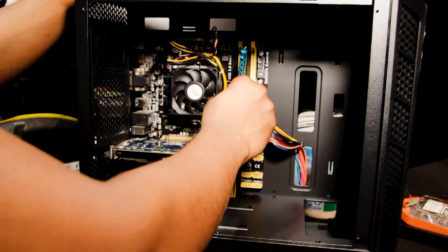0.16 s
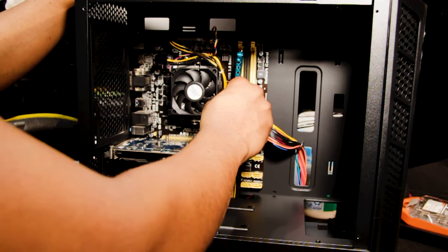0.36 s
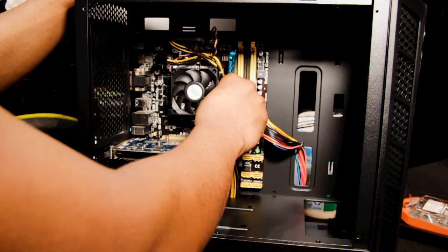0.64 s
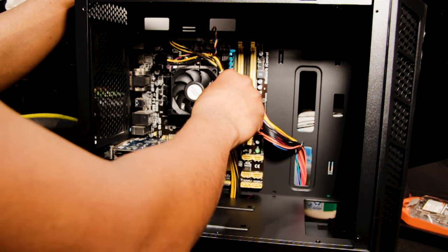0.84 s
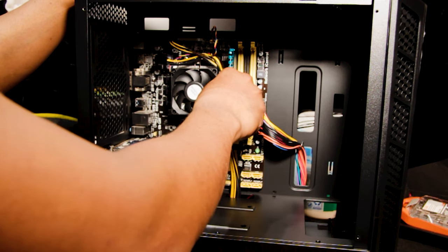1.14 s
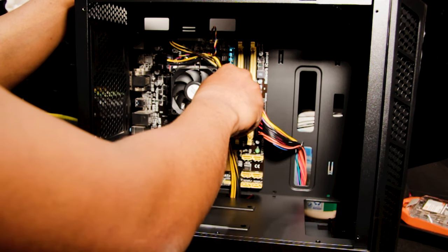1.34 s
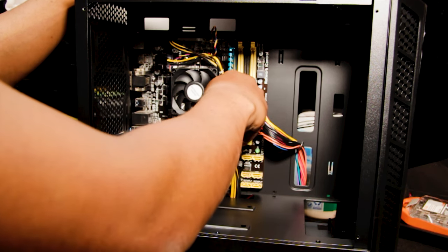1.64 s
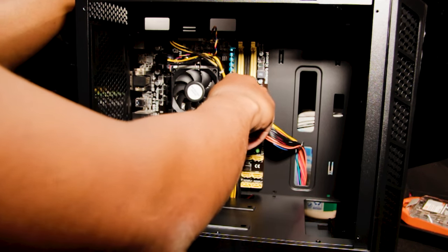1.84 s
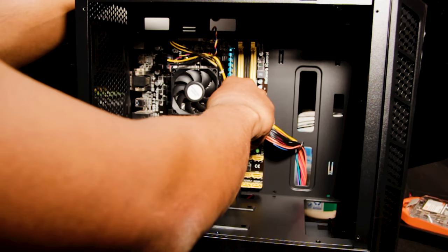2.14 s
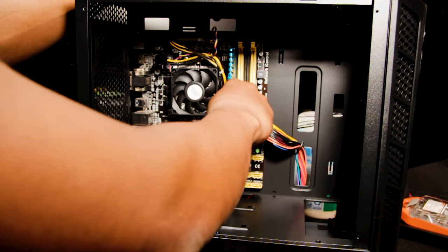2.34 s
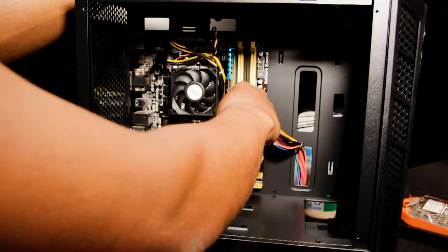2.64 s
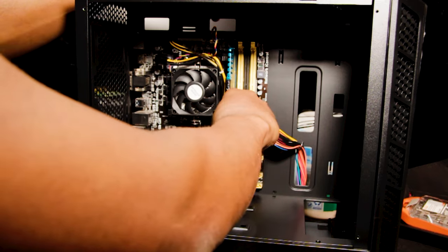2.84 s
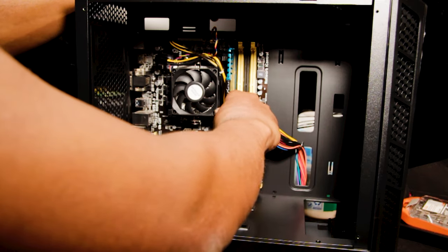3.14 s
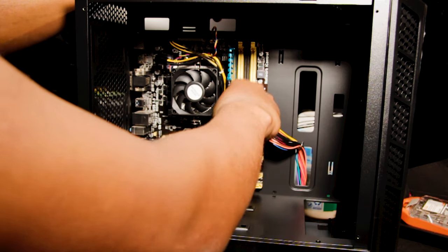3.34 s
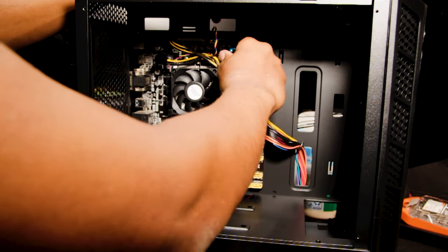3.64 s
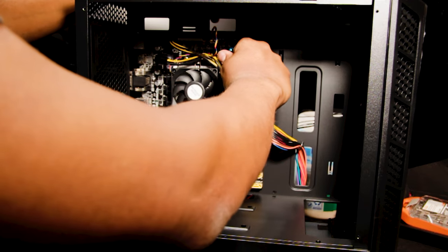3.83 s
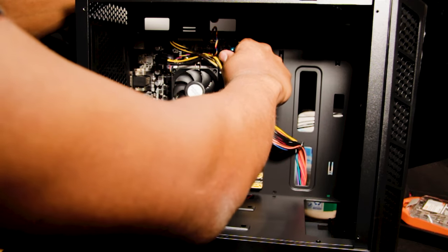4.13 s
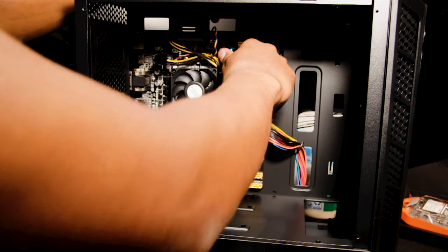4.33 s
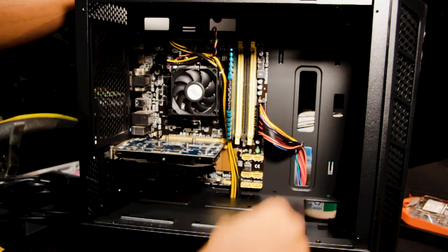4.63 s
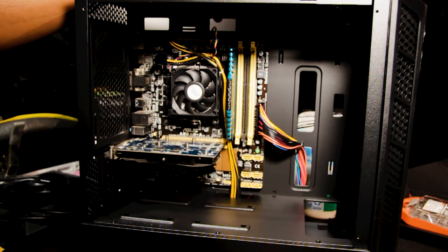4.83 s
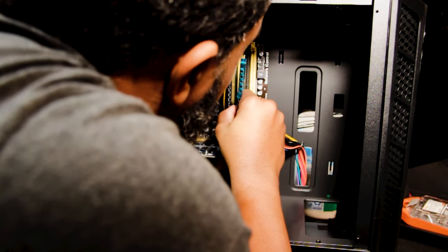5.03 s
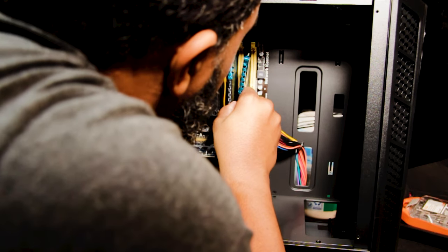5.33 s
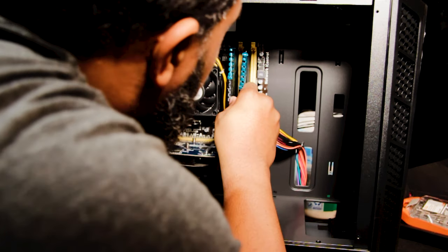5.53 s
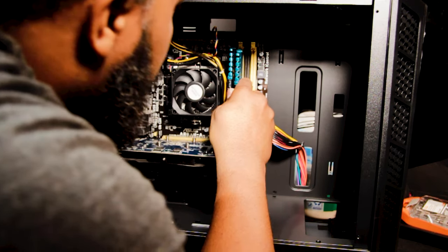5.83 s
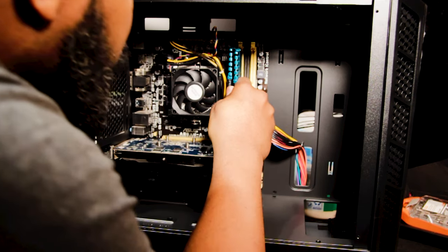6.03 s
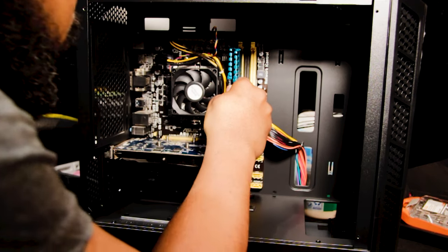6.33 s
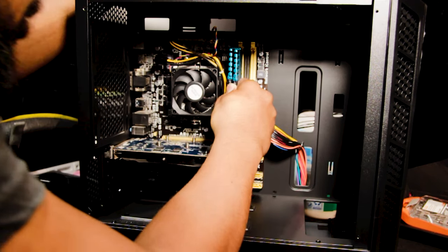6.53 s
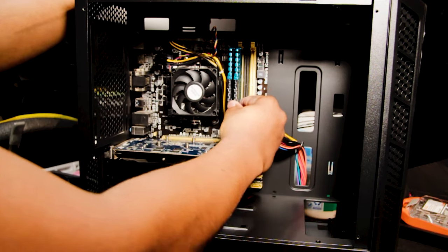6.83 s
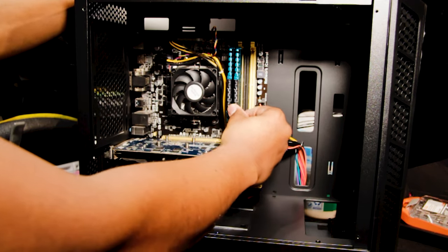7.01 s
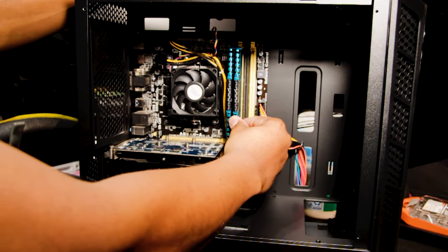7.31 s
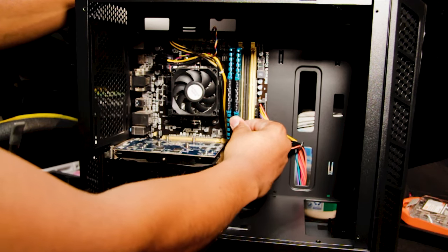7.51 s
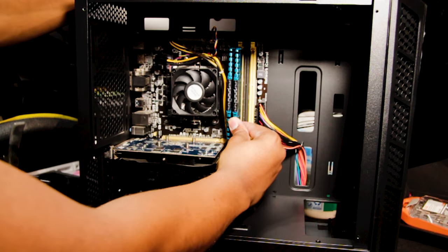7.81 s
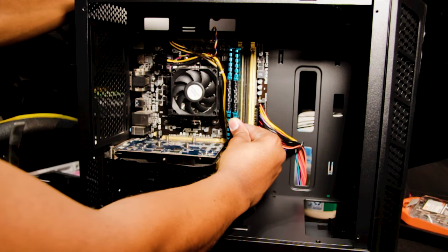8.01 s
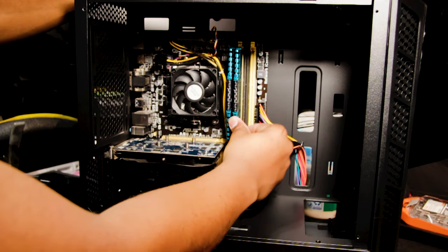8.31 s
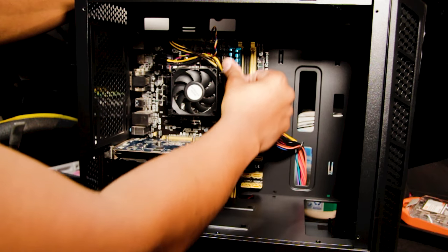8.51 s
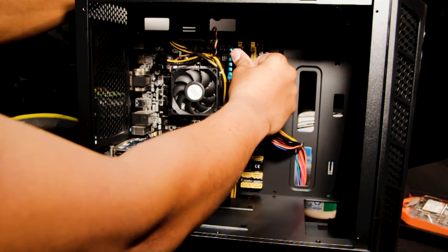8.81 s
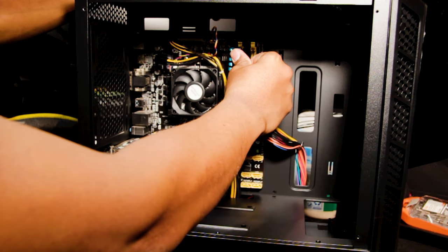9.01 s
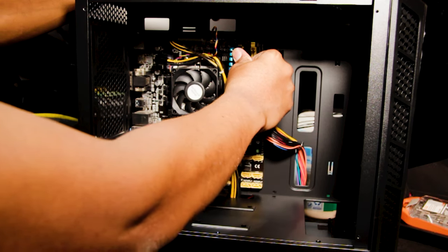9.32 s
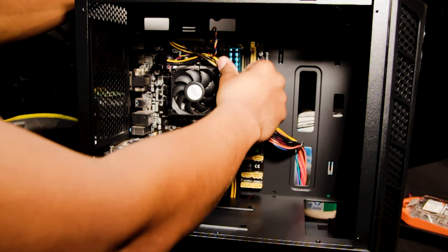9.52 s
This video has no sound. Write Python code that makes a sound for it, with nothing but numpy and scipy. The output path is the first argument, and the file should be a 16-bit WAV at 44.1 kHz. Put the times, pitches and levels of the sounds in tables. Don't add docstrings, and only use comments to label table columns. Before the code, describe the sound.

Close up at an open metal computer case, fingers tap and scrape board and cables, then a plastic latch cracks shut, followed about a second later by another. Lighter ticks and nudges fill the middle before two more snaps near the end, the last softest. Each contact briefly rings the panels; a quiet room hums beneath microphone hiss.

```python
import sys
import numpy as np
from scipy import signal
from scipy.fft import rfft, irfft
from scipy.io import wavfile
from scipy.ndimage import uniform_filter1d

SR = 44100
rng = np.random.default_rng(int(sys.argv[2]) if len(sys.argv) > 2 else 0)


def volts_from_db(level):
    exponent = np.asarray(level, float) / 20
    return 10 ** exponent


def store_wav(level_fs):
    pcm = np.round(np.clip(np.atleast_2d(level_fs), -1, 1) * 32767)
    wavfile.write(sys.argv[1], SR, pcm.T.astype(np.int16))


N = 426006


def level(x, db):
    return x * volts_from_db(db) / np.sqrt(np.mean(x ** 2))


def band(x, lo_hz, hi_hz):
    return signal.sosfilt(signal.butter(2, [lo_hz, hi_hz], "bandpass", fs=SR, output="sos"), x)


def coloured(points):
    cut_hz = 15770
    hz, db = np.transpose(points)
    f = np.maximum(np.fft.rfftfreq(N, 1 / SR), 1)
    gain = volts_from_db(np.interp(np.log(f), np.log(hz), db)) * (f < cut_hz)
    return level(irfft(rfft(rng.standard_normal(N)) * gain, N), 0)


def walk(rate_hz):
    hold = int(SR / rate_hz)
    steps = np.repeat(rng.standard_normal(N // hold + 1), hold)
    slewed = uniform_filter1d(uniform_filter1d(steps, hold), hold)
    return level(slewed[:N], 0)


def fade(t60_s, size):
    return 1000. ** (-np.arange(size) / SR / max(t60_s, .005))


def ring(modes, size=SR // 2):
    t = np.arange(size) / SR
    out = 0
    for k, (hz, db, t60_s) in enumerate(modes):
        out = out + (-1) ** k * volts_from_db(db) * np.sin(2 * np.pi * hz * t) * fade(t60_s, size)
    return out


def add(track, s, sound):
    i = int(s * SR)
    track[i:i + len(sound)] += sound[:N - i]


def contact(colour, ms, rise, blow_db, grit_db, size=SR // 4):
    # (frequency [Hz], early level [dB], early t60 [s], late level [dB], late t60 [s])
    case_bands = [(287, 3.5, 0.16, -10, 0.38), (410, 0.5, 0.13, -5, 0.39), (586, 2.5, 0.12, -7, 0.39),
                  (939, 8, 0.061, -6, 0.25), (1450, -1, 0.063, -5.5, 0.2), (2070, -4.5, 0.047, -1, 0.14),
                  (3110, 4.5, 0.061, -7.5, 0.15), (5050, 10.5, 0.027, -4, 0.15),
                  (6900, 13.5, 0.018, -20.5, 0.063), (9970, 9.5, 0.024, -8.5, 0.13),
                  (8340, 10, 0.027, -12, 0.16), (12130, 3, 0.03, -11.5, 0.12),
                  (13960, -15, 0.016, -20, 0.11)]
    t = np.arange(size) / SR * 1000 / np.clip(ms, .3, 30)
    chance = rng.standard_normal((3, size))
    unevenness_db = grit_db * uniform_filter1d(chance[1], 9) * 3.6
    grains = chance[0] * volts_from_db(unevenness_db) * np.exp(-t)
    grains[int(rise * ms * SR / 1000)] += volts_from_db(blow_db)
    swell = 1 - np.exp(-t / rise)
    colour_hz, colour_db = np.transpose(colour)
    out = 0
    for hz, early_db, early_t60_s, late_db, late_t60_s in case_bands:
        early = volts_from_db(early_db - 6.5) * fade(early_t60_s, size)
        late = volts_from_db(late_db - 1.5) * fade(late_t60_s, size)
        tail = chance[2] * (early + late)
        gain = volts_from_db(np.interp(np.log(hz), np.log(colour_hz), colour_db))
        out = out + gain * band((grains + tail) * swell, hz / 1.163, hz * 1.145)
    return out


def latches():
    # (time [s], peak [dB], chatter [ms])
    snaps = [
        (3.1233, -13, 1.9),
        (4.0805, -14.5, 2.36),
        (8.079, -13.5, 2.2),
        (9.1579, -17, 1.93),
    ]
    # (lead [ms], level [dB], frequency [Hz])
    yields = [
        (2.36, -35, 1080),
        (1.1, -23.5, 440),
        (2.7, -46, 1080),
        (2.48, -34.5, 660),
    ]
    # (frequency [Hz], density [dB per Hz])
    snap_colours = [
        [(150, -44), (250, -12), (968, -1.5), (1620, 0.5), (1950, 4), (2090, -3.5), (3620, -4.5), (4300, -12.5),
         (5460, -7), (6260, -24), (8970, -7), (15000, -12.5)],
        [(150, -35), (250, 2), (433, -1.5), (801, -8), (1360, 6), (1790, -11), (2130, -0.5), (4080, -3),
         (5280, -6.5), (7300, -14), (7960, -7), (15000, -14)],
        [(150, -33), (250, -6), (463, -7.5), (641, -0.5), (844, -8), (1250, -4.5), (1990, -0.5), (3620, -11),
         (5100, -10.5), (5950, -19), (10100, -6.5), (15000, -14)],
        [(150, -39), (250, -10), (788, -7.5), (919, -9), (1070, -18), (1390, -1.5), (1790, -6), (3620, -1),
         (5100, -2.5), (5550, -2), (10800, -7.5), (15000, -15)],
    ]
    # (frequency [Hz], level [dB], t60 [s])
    clacks = [
        [(800, -27, 0.043), (1982, -20.5, 0.038), (2693, -23, 0.025)],
        [(1286, -34.5, 0.07), (2890, -40, .05), (4790, -36, 0.035)],
        [(800, -30, 0.075), (1870, -22, 0.035), (2740, -33.5, 0.099)],
        [(1380, -39.5, 0.14), (3640, -19.5, 0.017), (4600, -43, 0.051)],
    ]
    # (frequency [Hz], level [dB], t60 [s])
    latch_modes = [
        [(305, -14.5, 0.38), (640, -8, 0.091), (824, -19, 0.22), (890, -19, 0.58), (931, 11, 0.086),
         (1002, -10.5, 0.17)],
        [(261, -20, 0.14), (316, -10, 0.26), (344, -10.5, 0.45), (570, 2, 0.28), (608, -20, 0.67),
         (985, -12, 0.47)],
        [(310, -0.5, 0.41), (560, -18, 0.3), (640, -6, 0.2), (904, 0, 0.23), (1044, -6, 0.2), (1113, -13, 0.32)],
        [(288, -0.5, 0.23), (354, -14, 0.44), (546, -18, 0.97), (646, -15, 0.092), (907, 3, 0.16),
         (1000, -12, 0.44)],
    ]
    latch_ring_db = [-38, -46, -47, -47.5]
    # (frequency [Hz], level [dB], t60 [s])
    long_modes = [(638, -53, 0.61), (555, -51, 0.55)]
    long_ring_db = [-2, 0.5, 2.5, -11]
    out = np.zeros(N)
    for k, (s, peak_db, ms) in enumerate(snaps):
        onset = 1 - fade(.003, SR // 2)
        lead_ms, db, hz = yields[k]
        add(out, s - lead_ms / 1000, ring([(hz, db, .02)]) * onset)
        crack = contact(snap_colours[k], ms, 0.16, blow_db=21, grit_db=2.0, size=SR // 3)
        add(out, s, volts_from_db(peak_db - 1.5) * crack)
        add(out, s, volts_from_db(long_ring_db[k]) * ring(long_modes) * (1 - fade(.2, SR // 2)))
        add(out, s, (ring(clacks[k]) + volts_from_db(latch_ring_db[k]) * ring(latch_modes[k])) * onset)
    return out


def contacts():
    # (time [s], peak [dB], weight = bass under peak [dB], hardness = treble under peak [dB])
    knocks = [(0.383, -46.5, -5.5, -21), (0.674, -40.5, -9.5, -12), (0.834, -29.5, -20, -18),
              (0.977, -36, -9.5, -22.5), (1.192, -36.5, -24, -14.5), (1.711, -48.5, -7, -14.5),
              (2.467, -50, -9.5, -19), (2.708, -37.5, -25, -14), (3.986, -42.5, -7, -15.5),
              (4.364, -62.5, 1, -7), (5.515, -57, -1, -18), (5.638, -54.5, -8, -18),
              (6.0008, -38, -10, -20), (6.834, -54.5, -0.5, -8), (7.37, -50, 1.3, -8),
              (8.212, -67, -2, -13), (3.881, -40.5, -20, -12), (9.102, -53.5, -2, 1.5)]
    # (time [s], peak [dB], weight [dB], hardness [dB])
    ticks = [(0.6121, -47, -30, -22), (0.6382, -49.5, -14, -12.5), (1.527, -53.5, -10.5, -19),
             (2.2789, -46, -19, -13), (3.2046, -46, -27, -19), (3.5799, -49, -12, -9.5),
             (5.7713, -39, -22, -11), (6.1495, -51.5, -20.5, -13.5), (6.3256, -39, -16, -13.5),
             (6.338, -44, -19, -23), (0.824, -51, -1, -19), (8.3732, -57, -24, -17),
             (9.431, -47.5, -21, -15), (9.5134, -65.5, -3.5, 1.1), (9.5555, -60, -11, -16)]
    # (time [s], peak [dB], weight [dB], hardness [dB])
    scrapes = [(1.2363, -38.5, -11.5, -14.5), (2.084, -54, -17, -7), (2.131, -51.5, -13, -11),
               (2.6242, -55, -9, -14), (2.6382, -56.5, -4, -7), (2.6609, -48, -10, -17.5),
               (2.9772, -48, -12, -24), (3.4273, -53.5, -25, -6), (3.59, -53.5, -7.5, -18),
               (3.881, -39, -16.5, -22), (5.0772, -42, -7.5, -12), (5.5042, -49, -3.5, -10),
               (6.0932, -53, -7, -11), (6.7, -62, 4, -7), (6.894, -55, -3.5, -6), (7.1944, -56, -8, -10),
               (7.2196, -52.5, -4, -12), (7.2404, -54, -1.5, -8), (7.2597, -56, -4.5, 4.5),
               (8.4418, -53, -10, -6), (9.0985, -41, -8, -3)]
    edges_hz = np.array([180, 600, 1800, 5000, 15000])
    # (frequency [Hz], level [dB], t60 [s])
    panel_modes = [(259.6, -3, 0.28), (298.6, -5.5, 0.37), (410, -5.5, 0.2), (632, -5, 0.23)]
    # (frequency [Hz], width [Hz], level [dB])
    cavity = [(2740, 460, -12), (4736, 500, -21.5), (9900, 1600, -13)]

    def dull(rms_db, weight_db, hard_db):
        return [weight_db, rms_db, hard_db, hard_db * 1.78]

    def thin(lean_db):
        return lambda rms_db, weight_db, hard_db: [weight_db - lean_db, weight_db + lean_db, rms_db, hard_db]

    # (table, band levels, peak to rms [dB], chatter [ms], rise [chatters], first blow [dB], grit [dB])
    kinds = ((knocks, dull, -9, 1.7, .18, 24, 2.5),
             (ticks, thin(1.5), -9, 1.7, .18, 22, 2.5),
             (scrapes, thin(-1.5), -7, 7.7, .9, 4, 3.5))
    out = np.zeros(N)
    centres_hz = [*np.sqrt(edges_hz[1:] * edges_hz[:-1]), edges_hz[-1]]
    for table, shape, rms_db, ms, rise, blow_db, grit_db in kinds:
        for s, peak_db, weight_db, hard_db in table:
            band_db = peak_db + np.array(shape(rms_db, weight_db, hard_db))
            per_hz_db = band_db - 10 * np.log10(np.diff(edges_hz) / (SR / 2))
            colour = np.transpose([centres_hz, [*per_hz_db, per_hz_db[-1] - 19.5]])
            add(out, s, contact(colour, ms, rise, blow_db, grit_db, size=SR // 5))
            struck = []
            for (hz, db, t60_s), luck in zip(panel_modes, rng.standard_normal(len(panel_modes))):
                struck.append((hz, db + band_db[0] - 10.5 + 3 * np.clip(luck, -2, 1.5), t60_s))
            add(out, s, ring(struck, SR // 4) * (1 - fade(0.0058, SR // 4)))
    return out + sum(volts_from_db(db) * band(out, hz - w / 2, hz + w / 2) for hz, w, db in cavity)


def parts(size=SR // 4):
    # (time [s], frequency [Hz], level [dB])
    board = [(.826, 786, -49), (.833, 800, -29), (.977, 708, -39), (1.191, 946, -48), (2.708, 1120, -46),
             (2.715, 640, -56), (.85, 640, -45.5), (.99, 480, -54), (6.0, 710, -45.5), (6.319, 420, -48.5),
             (7.368, 400, -48)]
    board_t60_s = 0.046
    part_modes = {"panel": (265, 0.096), "module": (1920, 0.047), "arm": (2770, 0.044),
                  "spreader": (4780, 0.062), "fins": (8400, 0.066), "springs": (10230, .085),
                  "bracket low": (2300, 0.1), "bracket middle": (3250, .14), "bracket high": (5020, .17)}
    # (time [s], part, level [dB])
    touches = [(.833, "module", -46), (1.191, "module", -46), (1.525, "arm", -55), (1.712, "springs", -55),
               (2.66, "springs", -66.5), (3.59, "bracket middle", -62.5), (5.084, "panel", -45),
               (5.09, "spreader", -56), (5.512, "panel", -47), (5.77, "bracket low", -48),
               (5.77, "bracket middle", -54), (5.77, "bracket high", -55), (5.77, "fins", -51),
               (6.01, "module", -58), (6.326, "panel", -50.5), (6.326, "spreader", -53),
               (6.895, "springs", -61), (7.195, "bracket middle", -66), (7.225, "bracket middle", -62),
               (7.23, "bracket high", -65), (7.255, "springs", -59), (7.26, "fins", -65),
               (7.369, "spreader", -54), (9.1, "panel", -46), (9.102, "spreader", -47), (9.429, "arm", -63),
               (9.431, "spreader", -59), (9.513, "arm", -59), (9.515, "springs", -59), (9.556, "arm", -64)]
    # (time [s], level [dB])
    thuds = [(0.386, -62), (0.675, -59), (1.201, -58), (1.709, -71), (3.125, -56.5), (3.876, -59),
             (4.08, -55.5), (5.081, -61), (5.509, -59.5), (6.322, -62), (8.079, -63), (9.102, -55),
             (9.158, -58)]
    # (frequency [Hz], level [dB], t60 [s])
    desk_modes = [(71.84, -1.5, 0.35), (96.6, -4.5, 0.61), (134.4, -1.5, 0.34)]
    out = np.zeros(N)
    touched = [(s, hz, db, board_t60_s) for s, hz, db in board]
    touched += [(s, part_modes[part][0], db, part_modes[part][1]) for s, part, db in touches]
    for s, hz, db, t60_s in touched:
        if hz > 3200:
            noise = band(rng.standard_normal(size), hz * .96, hz * 1.04)
            sound = level(noise, db - 4) * fade(t60_s, size)
        else:
            sound = ring([(hz, db, t60_s), (hz * 1.048, db - 2.5, t60_s), (hz * .93, db - 7.5, t60_s)], size)
        add(out, s, sound * (1 - fade(.004, size)))
    for s, db in thuds:
        add(out, s, volts_from_db(db - 2.0) * ring(desk_modes) * (1 - fade(0.079, SR // 2)))
    return out


def rustle():
    # (time [s], level [dB])
    busyness = [(0, -74.5), (.35, -74.5), (.7, -72), (1.6, -74), (2.7, -73.5), (4.4, -74.5), (6.8, -73.5),
                (7.3, -76.5), (9.66, -74.5)]
    # (frequency [Hz], density [dB per Hz])
    friction_colour = [(100, -10.5), (300, 3.5), (1000, -0.5), (3000, -4), (5000, -13.5), (12000, -15.5)]
    s, db = np.transpose(busyness)
    return coloured(friction_colour) * volts_from_db(np.interp(np.arange(N) / SR, s, db) + 2.6 * walk(30))


def room():
    # (frequency [Hz], density [dB per Hz])
    mid_colour = [(15, -47.5), (25, -12.5), (59, -3), (79, -11), (128, 2.5), (158, -3.5), (186, 2.5),
                  (219, -10), (363, -3.5), (415, -9), (621, -5.5), (879, -4), (1240, -6), (2020, -20),
                  (15000, -23)]
    # (frequency [Hz], density [dB per Hz])
    side_colour = [(15, -39.5), (25, -11), (59, -4.5), (301, -5), (438, -5), (978, -6.5), (1090, -7),
                   (1670, -7.5), (15000, -7)]
    # (frequency [Hz], width [Hz], level [dB])
    hum = [(89, 5.7, -80), (120.1, 4.8, -82.5), (184, 5.5, -84), (1002, 16, -91.5), (1196, 43.6, -85.5),
           (2840, 475, -84.5), (4884, 830, -85)]
    mid_db, side_db = -68, -73.5
    air = coloured(mid_colour[:-1]) * volts_from_db(mid_db)
    mid = air + (volts_from_db(1.485 * walk(1.3)) - 1) * band(air, 30, 1200)
    for hz, w, db in hum:
        mid += level(band(rng.standard_normal(N), hz - w / 2, hz + w / 2), db)
    return mid, coloured(side_colour[:-1]) * volts_from_db(side_db)


def scene():
    heard = latches() + contacts() + parts()
    scatter = rng.standard_normal(400) * fade(0.0046, 400)
    apart = signal.fftconvolve(heard, scatter)[:N]
    apart = volts_from_db(-45) * band(apart, 4500, 17700) + volts_from_db(-61.5) * band(apart, 100, 4070)
    air, air_side = room()
    mid, side = heard + rustle() + air, apart + air_side
    return np.array([mid + side, mid - side])


def top_cut(x):
    return signal.sosfilt(signal.butter(12, 16780, fs=SR, output="sos"), x)


def record(dry):
    dull = signal.sosfilt(signal.cheby2(10, 45, 16700, fs=SR, output="sos"), dry)
    return top_cut(dull)


dry = scene()
out = record(dry)
store_wav(out)
```